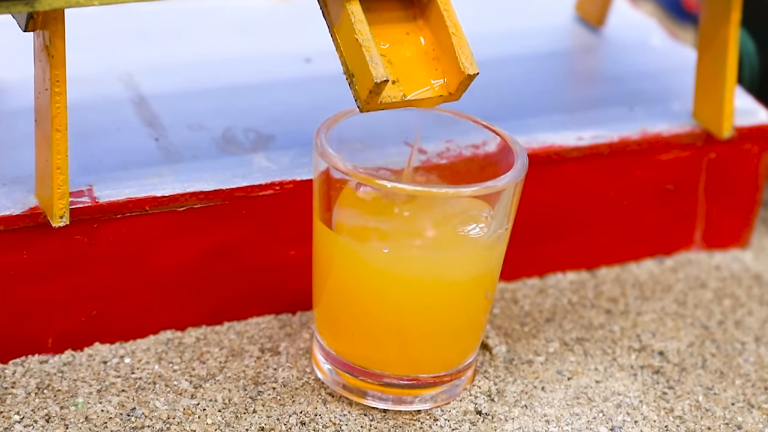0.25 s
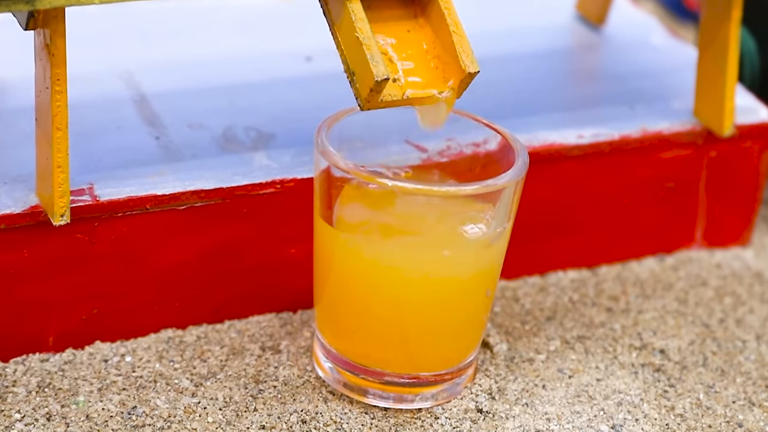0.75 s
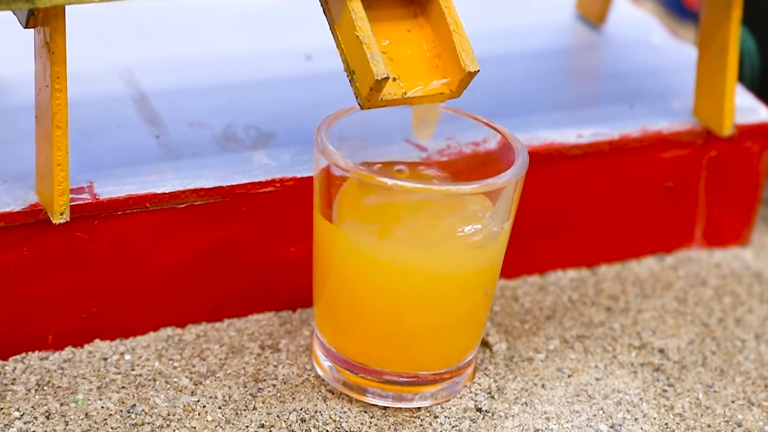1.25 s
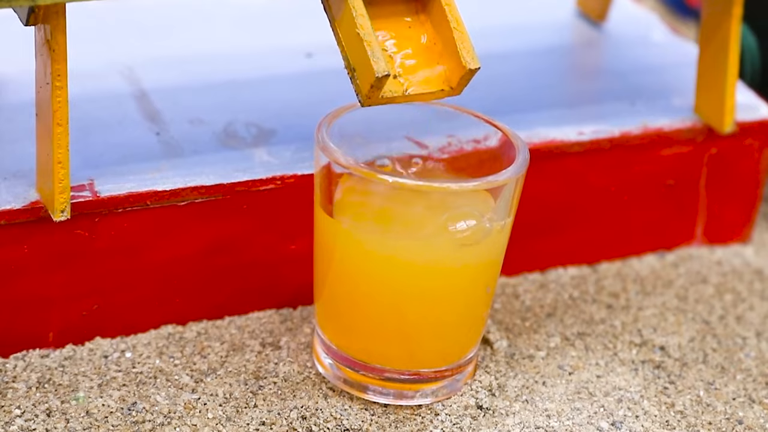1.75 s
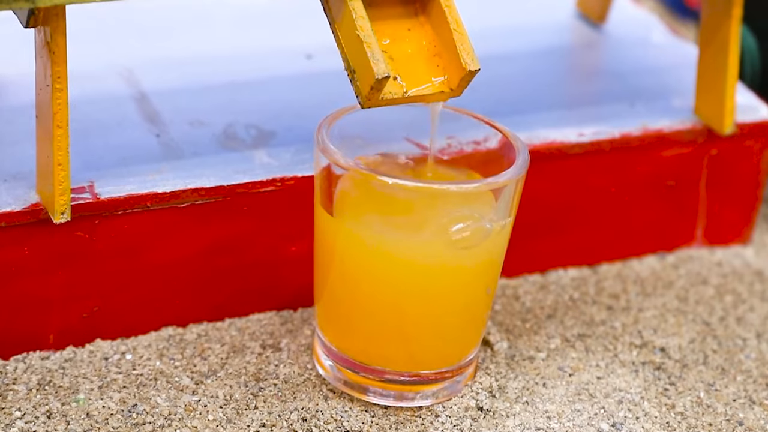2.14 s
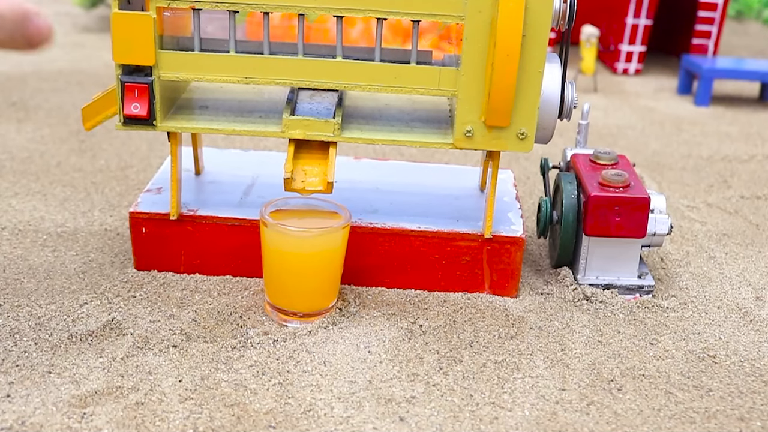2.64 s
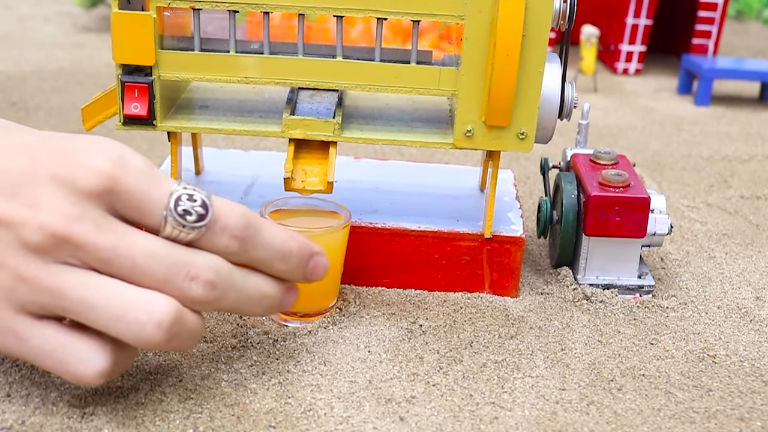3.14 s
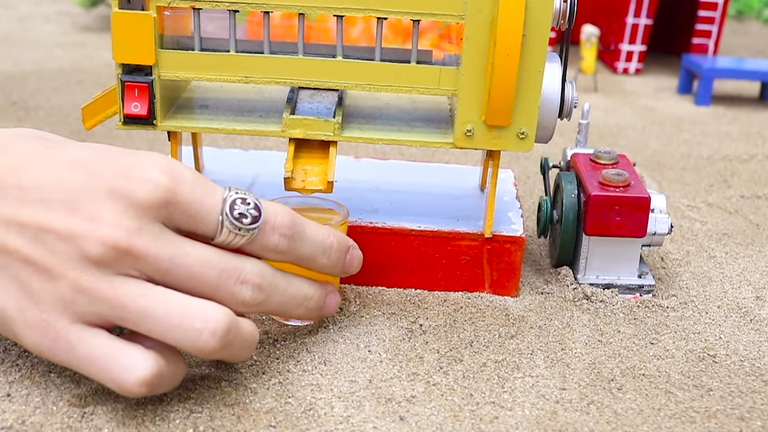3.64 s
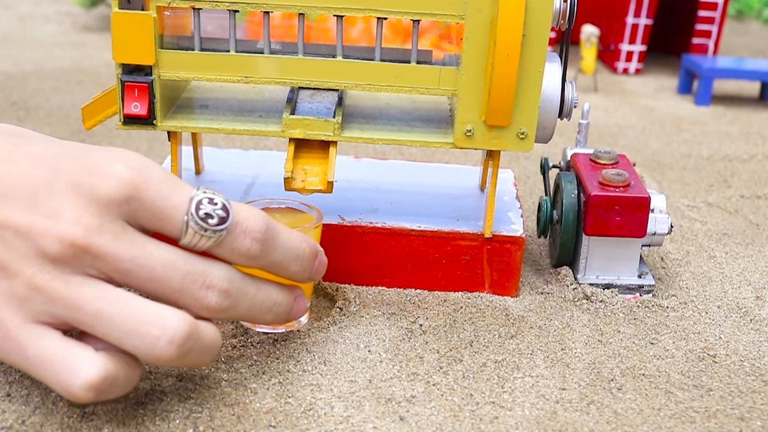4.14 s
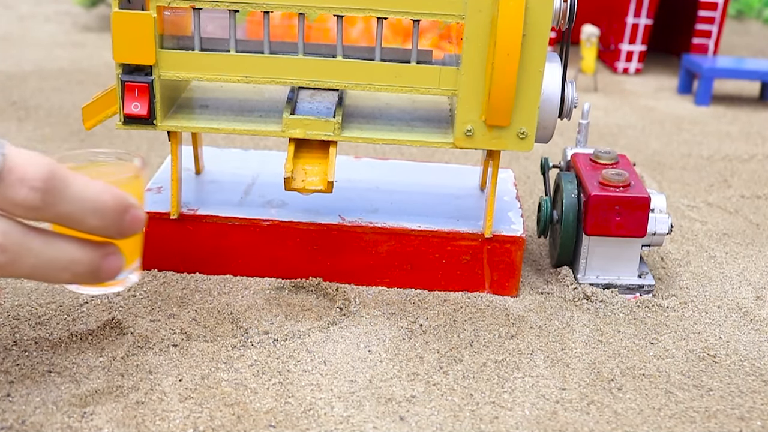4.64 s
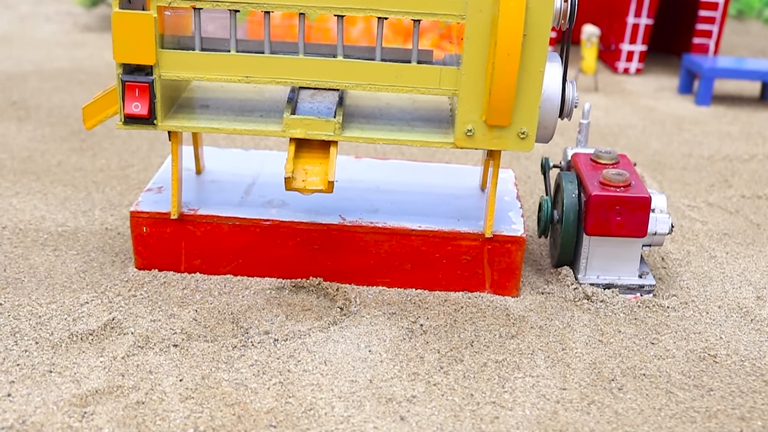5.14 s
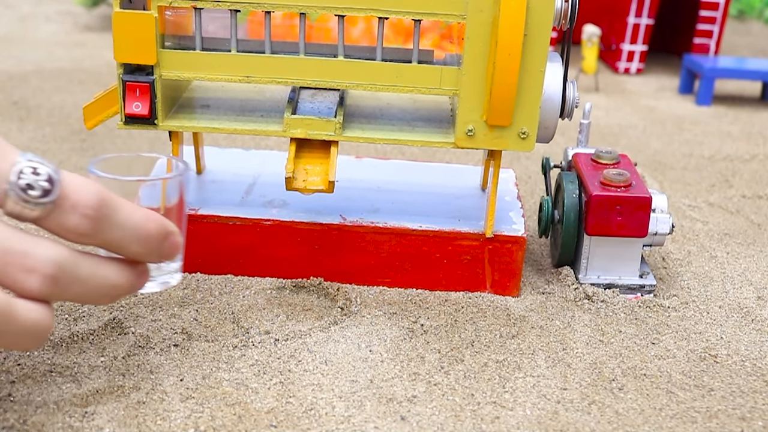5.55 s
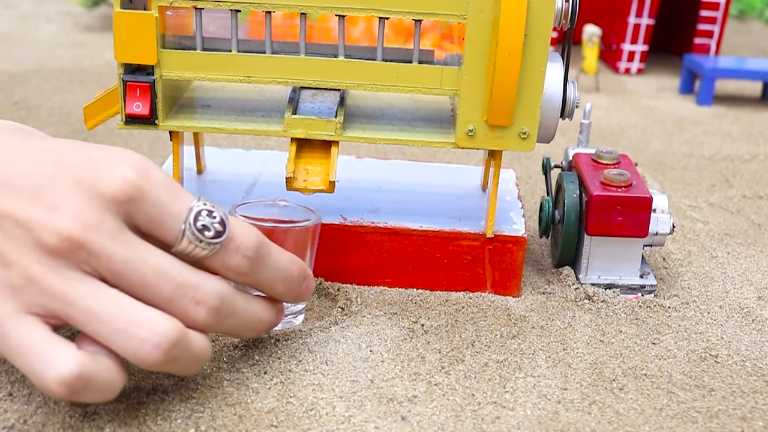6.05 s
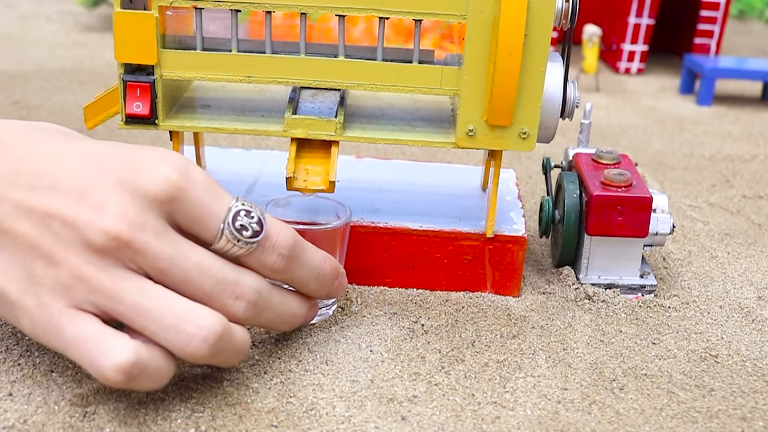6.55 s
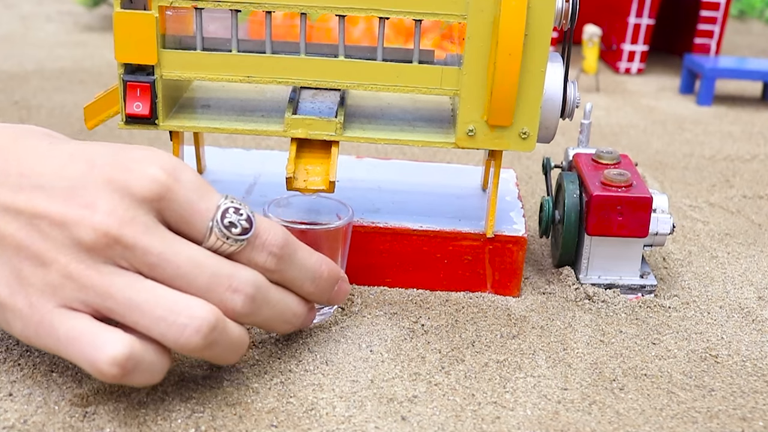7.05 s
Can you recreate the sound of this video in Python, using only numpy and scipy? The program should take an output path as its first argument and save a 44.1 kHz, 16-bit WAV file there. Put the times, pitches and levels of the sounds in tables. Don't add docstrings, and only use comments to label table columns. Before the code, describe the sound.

Buzzing toy motor stops, juice drips and trickles out, a full glass judders away with a thud, and an empty one clinks down amid distant birds.

```python
import sys
import numpy as np
from scipy import signal
from scipy.fft import rfft, irfft
from scipy.io import wavfile
from scipy.ndimage import uniform_filter1d

SR = 44100
rng = np.random.default_rng(int(sys.argv[2]) if len(sys.argv) > 2 else 0)


def elevation(decibels):
    levels = np.asarray(decibels, float)
    return 10 ** (levels / 20)


def to_wav(s):
    ch = np.atleast_2d(s).T
    pcm = np.round(np.clip(ch, -1, 1) * 32767)
    wavfile.write(sys.argv[1], SR, pcm.astype(np.int16))


N = 321930


def evened(x):
    return x / np.sqrt(np.mean(x ** 2) + 1e-20)


def read(points, hz):
    f, value = np.transpose(points)
    return np.interp(np.log(hz + 1), np.log(f + 1), value)


def add(mix, s, sound):
    part = mix[..., round(s * SR):][..., :sound.shape[-1]]
    part += sound[..., :part.shape[-1]]


def colour(x, points):
    gain = elevation(read(points, np.fft.rfftfreq(x.shape[-1], 1 / SR)))
    return irfft(rfft(x) * gain, x.shape[-1])


def resonate(x, hz, width):
    turn = np.exp(2j * np.pi * np.cumsum(hz * np.ones(len(x))) / SR)
    r = np.exp(-np.pi * width / SR)
    return 2 * (turn * signal.lfilter([1 - r], [1, -r], x / turn)).real


def ring(hz, t60, rise=0., length=.05, attack=0.00061):
    t = np.arange(round(length * SR)) / SR
    tone = np.sin(2 * np.pi * hz * (t + .5 * rise * t ** 2 / t60))
    return tone * elevation(-60 * t / t60) * (1 - np.exp(-t / attack))


def burst(hz_low, hz_high, t60, attack=0.00014):
    t = np.arange(2048) / SR
    sos = signal.butter(3, [hz_low, min(hz_high, .49 * SR)], "band", fs=SR, output="sos")
    noise = signal.sosfilt(sos, rng.standard_normal(len(t)))
    puff = noise * elevation(-60 * t / t60) * (1 - np.exp(-t / attack)) ** 2
    return puff / abs(puff).max()


def tail(t60, delay_s, length=1.4):
    t = np.arange(round(length * SR)) / SR
    echoes = rng.standard_normal((2, len(t))) * (rng.random((2, len(t))) < .08)
    taps = echoes * elevation(-60 * t / t60) * (t > delay_s)
    return taps / np.linalg.norm(taps, axis=1, keepdims=True)


# frequency in Hz, correlation from -1 to 1.
EAR_CORRELATION = [(60, 1), (240, 0.89), (950, -0.16), (3770, -0.26), (15000, 0.15)]
# frequency in Hz, density in dB per Hz.
AIR_SPECTRUM = [(12, -34.5), (22, -8.5), (60, 0.5), (160, -11), (540, -27), (850, -27), (1750, -39),
                (4500, -37), (8300, -54), (9000, -60), (11800, -67.5), (12400, -94.5)]
# time in seconds, low singers in dB, high singers in dB.
CHORUS_SWELL = [
    (1.9, -72, -66),
    (2.19, -47, -71.5),
    (3.09, -47, -71.5),
    (4.371, -53.5, -61),
    (7.3, -58, -79.5),
]
AIR_DB = -40.5


def air():
    frames, hz = N // 512 + 5, np.fft.rfftfreq(2048, 1 / SR)[:, None]
    a, b, c, d, patches = rng.standard_normal((frames, 1025, 5)).T
    patches = evened(uniform_filter1d(uniform_filter1d(patches, 16, 0), 8, 1))
    same = np.clip(read(EAR_CORRELATION, hz), -1, 1)
    left = a + 1j * b
    right = same * left + np.sqrt(1 - same ** 2) * (c + 1j * d)
    s, *levels = np.transpose(CHORUS_SWELL)
    frame_s = np.arange(frames) * 512 / SR
    low, high = (np.interp(frame_s, s, db - np.mean(db)) for db in levels)
    swell_db = low * np.exp(-((hz - 3100) / 900) ** 4) + high * np.exp(-((hz - 6400) / 2400) ** 4)
    gain = elevation(read(AIR_SPECTRUM, hz) + (1.5 + hz / 5000) * patches + swell_db)
    field = signal.istft(np.array([left, right]) * gain, nperseg=2048, noverlap=1536)[1]
    return elevation(AIR_DB) * evened(field[:, :N])


# start in seconds, length in seconds, pitch in Hz, level in dB.
HELD_NOTES = [(1.981, 0.12, 3920, -59), (2.015, 0.033, 3620, -56.5), (2.081, 0.021, 2480, -58),
              (2.389, 0.12, 3870, -53.5), (2.395, 0.032, 2750, -56.5), (2.416, 0.051, 2424, -57.5),
              (2.601, 0.021, 4180, -48.5), (2.712, 0.077, 3094, -53), (2.752, 0.024, 2450, -58),
              (2.803, 0.21, 3774, -58.5), (2.965, .02, 3180, -57.5), (3.285, 0.04, 3220, -53),
              (3.681, 0.023, 4346, -49.5), (3.755, 0.062, 7480, -64), (3.916, 0.049, 6100, -56.5),
              (3.994, 0.044, 4360, -47), (4.304, 0.045, 4280, -51), (4.564, 0.087, 4140, -57),
              (4.581, 0.067, 3770, -53), (4.772, 0.063, 5410, -56), (5.04, 0.15, 5220, -59),
              (5.063, 0.087, 5530, -62), (5.338, 0.066, 7240, -60.5), (5.493, 0.085, 7830, -68.5),
              (5.519, .08, 8400, -72.5), (5.57, 0.071, 8070, -66), (5.625, 0.05, 7800, -70),
              (5.708, 0.022, 3870, -50), (5.783, 0.044, 3940, -82), (6.251, .1, 3380, -70),
              (6.297, 0.046, 4230, -69.5), (6.575, 0.29, 1406, -67), (6.645, 0.031, 3160, -66),
              (7.22, .08, 7300, -80)]
SAG = 0.00925
# start in seconds, length in seconds, turning pitch in Hz, level in dB.
DIP_NOTES = [(2.084, 0.15, 2967, -55), (2.12, 0.067, 2606, -54), (2.398, 0.13, 3250, -52),
             (2.45, .06, 2597, -56), (2.793, 0.041, 2614, -52.5), (3.186, 0.02, 2800, -57),
             (3.207, .025, 2850, -56), (3.315, .045, 2830, -53), (3.579, 0.03, 2870, -58.5),
             (7.16, 0.048, 2550, -60)]
# start in seconds, length in seconds, turning pitch in Hz, level in dB.
ARCH_NOTES = [(2.765, .04, 3180, -54), (2.9, .025, 3250, -58), (2.93, 0.045, 3480, -51),
              (3.125, .03, 2750, -57), (3.845, .03, 3800, -61)]
# start in seconds, length in seconds, turning pitch in Hz, level in dB.
TRILL_NOTES = [(3.603, .035, 3200, -57), (3.638, .04, 3200, -57)]
TRILL_BEND = -2.2
BEND_PER_S = 1.9
# start in seconds, first pitch in Hz, last pitch in Hz, level in dB.
SWEEP_NOTES = [(2.298, 5580, 4160, -53.5), (2.579, 5450, 4000, -55.5), (3.428, 4530, 5940, -56.5),
               (3.441, 5220, 3620, -56), (4.208, 8370, 6840, -55), (4.355, 7540, 4520, -47.5),
               (4.456, 7220, 4660, -46.5), (4.557, 6880, 5160, -46), (4.652, 7180, 4150, -46),
               (4.816, 5490, 7420, -50)]
# start in seconds, first pitch in Hz, last pitch in Hz, level in dB.
SLIDE_NOTES = [(2.253, 2250, 1790, -59), (2.583, 2255, 1900, -56), (2.937, 2230, 1750, -61),
               (3.025, 3430, 2690, -54.5), (3.272, 3550, 3280, -54), (3.358, 3200, 3520, -53),
               (3.455, 4200, 3600, -58), (3.867, 4300, 4970, -51.5), (4.085, 6700, 6240, -53),
               (4.243, 6740, 6140, -49.5), (4.715, 4020, 4800, -53.5), (4.775, 4660, 5180, -47),
               (4.849, 7370, 7900, -60), (6.36, 2800, 2450, -69), (6.584, 3600, 2900, -70),
               (7.24, 2770, 3250, -62.5)]
# start in seconds, first pitch in Hz, last pitch in Hz, level in dB.
CHIP_NOTES = [(5.34, 5200, 3600, -68), (5.417, 5160, 3660, -62), (5.727, 5800, 3800, -67),
              (5.865, 6000, 4000, -72), (5.99, 5200, 3800, -70), (6.205, 3700, 5200, -71),
              (6.339, 4180, 6300, -72), (6.646, 3750, 6200, -70), (6.675, 7000, 9000, -70),
              (6.705, 7000, 8600, -71), (6.811, 3740, 6000, -69)]
SWEEP_HZ_PER_S, SLIDE_HZ_PER_S, CHIP_HZ_PER_S = 60000, 15000, 54000


def song():
    notes = [(s, d, hz * (1 + SAG), hz, hz * (1 - SAG), db) for s, d, hz, db in HELD_NOTES]
    for table, way in ((DIP_NOTES, 1), (ARCH_NOTES, -1), (TRILL_NOTES, TRILL_BEND)):
        for s, d, hz, db in table:
            end_hz = hz * (1 + way * BEND_PER_S * d)
            notes.append((s, d, end_hz, hz, end_hz, db))
    for table, pace in ((SWEEP_NOTES, SWEEP_HZ_PER_S), (SLIDE_NOTES, SLIDE_HZ_PER_S),
                        (CHIP_NOTES, CHIP_HZ_PER_S)):
        notes += [(s, abs(b - a) / pace, a, np.sqrt(a * b), b, db) for s, a, b, db in table]
    return notes


def birds():
    notes = song()
    direct, sent = np.zeros((2, N)), np.zeros(N)
    for (s, length, *hz, db), side in zip(notes, rng.uniform(-1.2, 1, len(notes))):
        u = np.linspace(0, 1, round((length + 0.0077) * SR))
        glide = np.clip(u * (1 + .012 / length) - .006 / length, -.04, 1.04)
        pitch = np.polyval(np.polyfit([0, .5, 1], hz, 2), glide)
        slow = uniform_filter1d(uniform_filter1d(rng.standard_normal(len(u)), 300), 300)
        quiver = elevation(1.5 * evened(slow))
        whistle = np.sqrt(2) * np.sin(2 * np.pi * np.cumsum(pitch) / SR)
        note = elevation(db) * whistle * signal.windows.tukey(len(u), .3) * quiver
        add(sent, s - .006, note)
        add(direct[0], s - .006, elevation(2.5 + 3 * side) * note)
        add(direct[1], s - .006 + .00034, elevation(2.0 - 3 * side) * note)
    leaf_taps = tail(0.044, 0.0018, 0.08)
    leaves = np.array([signal.oaconvolve(ear, taps)[:N] for ear, taps in zip(direct, leaf_taps)])
    woods = signal.fftconvolve(sent[None], tail(1.0, 0.003), axes=1)[:, :N]
    return direct + elevation(-3) * leaves + elevation(2.0) * woods


def gate(x, hole_db=-3.3, from_hz=1100):
    hz, t, z = signal.stft(x, SR, nperseg=1024)
    power = (abs(z) ** 2).mean(0)
    level_db = 10 * np.log10(uniform_filter1d(uniform_filter1d(power, 6, 0), 4, 1) + 1e-20)
    usual_db = uniform_filter1d(uniform_filter1d(level_db, 12, 0), 30, 1)
    luck = rng.standard_normal((len(t) // 5 + 1, len(hz) // 6 + 1)).T
    blocks = np.kron(luck, np.ones((6, 5)))[:len(hz), :len(t)]
    shortfall_db = usual_db + hole_db - level_db + 2.2 * blocks
    keep = 1 / (1 + elevation(np.clip(12 * shortfall_db, -80, 80)))
    return signal.istft(z * np.where(hz[:, None] > from_hz, keep, 1), SR, nperseg=1024)[1][:, :N]


def glass(blows, modes, stand_t60, stand_attack, rumble_t60, split, damped_s=9.):
    out, rim = np.zeros((2, N))
    for s, db, stand_hz, rim_db, grit_db in blows:
        add(out, s, elevation(db) * ring(stand_hz, stand_t60, length=.1, attack=stand_attack))
        add(out, s, elevation(db - 20.5) * ring(1.11 * stand_hz, stand_t60, length=.1, attack=stand_attack))
        add(out, s, elevation(db - 13.5) * burst(180, 1500, rumble_t60, attack=0.00086))
        add(out, s, elevation(db + grit_db) * burst(1490, 4600, 0.023, attack=.001))
        add(out, s, elevation(db + grit_db - 9.5) * burst(4800, 10700, 0.02))
        for (hz, mode_db, t60), luck in zip(modes, rng.standard_normal(len(modes))):
            pair = ring(hz, t60, length=.4, attack=0.00072)
            pair = pair + split * ring(hz * 1.012, .5 * t60, length=.4, attack=0.00087)
            add(rim, s, elevation(db + rim_db + mode_db + 2.0 * luck) * pair)
    out = out + rim * np.clip((damped_s - np.arange(N) / SR) / 0.002, 0, 1)
    return signal.sosfilt(signal.butter(12, 13600, fs=SR, output="sos"), out)


# start in seconds, level in dB, stand pitch in Hz, rim in dB over its usual share.
DRAG_BLOWS = [(4.049, -43, 1300, -2), (4.062, -30, 1350, -9), (4.078, -24.5, 1410, -7),
              (4.085, -26, 1580, -4), (4.091, -20.5, 290, -21), (4.102, -22, 1220, -4),
              (4.111, -18, 430, -2), (4.121, -11, 505, -6.5), (4.129, -7, 560, -1), (4.133, -14, 1635, 0.5),
              (4.1395, -11.5, 555, 1), (4.1431, 0, 533, -8), (4.1445, -14, 2600, -0.5),
              (4.154, -19.5, 1695, 7.5), (4.1545, -25, 4500, -13), (4.16, -16, 1137, 4),
              (4.16, -21.5, 402, -18)]
# frequency in Hz, level in dB, t60 in seconds.
FULL_MODES = [(1498, -12, 1.6), (1116, -3.5, 0.14), (3000, -20.5, 0.82), (3044, -0.5, 0.03),
              (1685, -4, 0.066), (2530, -5, 0.068), (2697, 0.5, 0.055), (4500, -3.5, 0.014),
              (5001, -18, 0.12), (7400, -11.5, 0.1), (10080, -15.5, 0.14), (12700, -14, 0.064)]
HAND_DAMPS_S = 4.385
RIM_DB, RIM_FOLLOW, GRIT_DB, GRIT_FOLLOW = -18, 0.61, -24.5, 0.37


def full_glass():
    blows = []
    for s, db, hz, rim_db in DRAG_BLOWS:
        rim = RIM_DB + rim_db - (1 - RIM_FOLLOW) * db
        grit = GRIT_DB + rim_db - (1 - GRIT_FOLLOW) * db
        blows.append((s, db, hz, rim, grit))
    return glass(blows, FULL_MODES, 0.039, 0.0022, 0.064, 0.059, HAND_DAMPS_S)


# start in seconds, level in dB, stand pitch in Hz,
# rim in dB over the blow, grit in dB over the blow.
KNOCK_BLOWS = [
    (6.4437, -5.5, 923, -25, -29.5),
    (6.444, -23, 4870, -32, -34),
    (6.4555, -22.5, 850, -34.5, -32),
    (6.4643, -9, 347, -12, -10),
    (6.4648, -10.5, 975, -36, -8.5),
    (6.4665, -7, 540, -2.5, -13),
    (6.472, -10, 297, -4.5, -12),
    (6.4725, -10, 1526, -27, -13),
    (6.483, -16, 326, -27.5, -13),
]
# frequency in Hz, level in dB, t60 in seconds.
EMPTY_MODES = [(617, -12, 0.14), (990, -16.5, 0.16), (1487, -14, 0.12), (1570, -1, 0.086),
               (2040, -9, 0.035), (2536, -11.5, 0.045), (2994, -9, 0.16), (5070, -3.5, 0.057),
               (6660, -22, 0.07), (7420, -11.5, 0.099), (10020, -30, 0.094), (11300, -41.5, 0.1),
               (12690, -29.5, 0.13)]


def empty_glass():
    return glass(KNOCK_BLOWS, EMPTY_MODES, 0.03, 0.00059, 0.096, 0.27)


# start in seconds, peak in dB, bubble pitch in Hz.
STREAM_GULPS = [(0.123, -7.5, 1880), (.1336, -33, 1900), (0.161, -8, 1620), (0.293, -6.5, 1570),
                (0.525, -9, 1810), (.58, -9.5, 2150), (0.62, -11, 1780), (0.785, -4, 1850),
                (0.819, -9.5, 1370), (.82, -9, 1707), (0.957, -16, 1630), (0.997, -22.5, 2040)]
# start in seconds, peak in dB, bubble
# pitch in Hz.
LATE_DRIPS = [(1.062, -10, 2290), (1.105, -13, 2000), (1.192, -15, 2330), (1.213, -9, 1920),
              (1.237, -20, 3210), (1.266, -18, 2550), (1.309, -20, 2540), (1.344, -27, 1480),
              (1.389, -27, 1750), (1.407, -12, 3460), (1.4063, -18.5, 1730), (1.452, -17, 2270),
              (1.487, -15, 1970), (1.508, -17, 2200), (1.521, -15, 1710), (1.564, -17, 1830),
              (1.594, -12.5, 2340), (1.621, -10.5, 2210), (1.639, -20, 2100), (1.697, -16.5, 1900),
              (1.718, -16.5, 2120), (1.76, -26, 1330), (1.791, -20, 1510), (1.823, -25, 1970),
              (1.902, -19.5, 2750), (1.936, -18, 1950),
              (1.086, -20.5, 2320), (1.121, -27, 1870), (1.135, -26, 3180), (1.177, -34, 2680),
               (1.205, -18.5, 2020), (1.227, -15, 2080), (1.25, -21, 1510), (1.36, -22.5, 2460),
               (1.428, -28, 2390), (1.492, -21, 1940), (1.569, -16.5, 1820), (1.599, -19.5, 2310),
               (1.644, -30, 2480), (1.681, -28, 1410), (1.703, -20, 2060), (1.726, -17, 1550),
               (1.777, -23, 2000), (1.799, -23, 1670), (1.805, -29, 1960), (1.85, -24.5, 2150),
               (1.917, -29, 2480), (1.971, -35.5, 2700), (2.05, -33, 2460), (2.064, -39, 2300)]
SPOUT_HZ, HEADSPACE_HZ, HOLLOW_DB = 435.5, 700, -21


def landings():
    out = np.zeros(N)
    drops = STREAM_GULPS + LATE_DRIPS
    for (s, db, hz), (u, v, w, q) in zip(drops, rng.random((len(drops), 4))):
        add(out, s + 0.001293, elevation(db - 1.5) * ring(hz, 0.01 + 0.013 * u, rise=0.46, attack=0.00041))
        add(out, s + 0.0031 + 0.008 * v, elevation(db - 6.5) * ring(hz * (0.75 + 0.5 * w), .012, rise=0.47))
        hollow_hz = (SPOUT_HZ if q < .5 else HEADSPACE_HZ) * (.9 + 0.22 * u)
        add(out, s + 0.00099, elevation(db + HOLLOW_DB) * ring(hollow_hz, 0.055, rise=0.216, attack=0.00033))
        add(out, s - .001, elevation(db - 9.5) * burst(0.66 * hz, 1.6 * hz, 0.019, attack=0.0045))
        add(out, s + 0.001145, elevation(db - 7 - 4 * w) * burst(0.4 * hz, 4800, 0.004))
        add(out, s, elevation(db - 24.5) * burst(1400, 7000, 0.16, attack=0.0052))
    return out


# start in seconds, peak in dB, hollow pitch in Hz.
DEEP_PLUNGES = [(.105, -15.5, 683), (.126, -31, 580), (.161, -18, 820), (.162, -21, 470), (.163, -18, 1040),
                (.209, -18, 580), (.293, -12, 777), (.312, -26.5, 420), (.361, -19, 790),
                (.481, -21.5, 470), (.525, -18.5, 790), (.617, -13, 802), (.76, -15.5, 784),
                (.87, -17, 770), (.957, -18, 746), (1.063, -24.5, 393), (1.212, -27.5, 380),
                (1.309, -22.5, 747), (1.594, -18, 620), (1.66, -30.5, 450), (1.718, -23, 584),
                (1.78, -26, 760), (1.936, -32, 686)]


def plunges():
    out = np.zeros(N)
    for s, db, hz in DEEP_PLUNGES:
        add(out, s + 0.00092, elevation(db) * ring(hz, 0.037, rise=0.23, attack=0.0012))
        add(out, s, elevation(db - 8.5) * burst(0.52 * hz, 1.68 * hz, 0.032, attack=0.0013))
    return out


# start in seconds, peak in dB, centre in Hz.
BURSTING_DROPLETS = [(0.16, -9.5, 5270), (0.192, -12.5, 5560), (0.2335, -25, 7620), (0.247, -9, 7700),
                     (.2678, -15, 5990), (0.3106, -11.5, 9100), (.4334, -20, 5000), (.4604, -18, 5000),
                     (0.499, -10, 6840), (0.526, -9.5, 4900), (0.539, -15, 7000), (0.616, -13.5, 5460),
                     (0.745, -3, 5950), (0.8182, -18.5, 5240), (0.86, -12, 7050), (0.902, -14, 7590),
                     (1.006, -17, 10000), (1.023, -13, 9800), (1.052, -18, 11700), (1.066, -5.5, 8100),
               (1.0929, -25, 4500), (1.106, -14, 6330), (1.1214, -15.5, 10000), (1.1507, -16, 7460),
               (1.1557, -13, 9700), (1.1943, -18.5, 5570), (1.2121, -29, 4650), (1.2386, -21, 4700),
               (1.251, -20, 7780), (1.268, -15.5, 4700), (1.3109, -8, 6300), (1.3418, -14.5, 4660),
               (1.354, -22, 7400), (1.4085, -32, 4820), (1.4184, -24, 10400), (1.4441, -19, 5070),
               (1.488, -20, 4720), (1.5073, -19.5, 5940), (1.559, -17, 4590), (1.565, -15, 9800),
               (1.595, -19, 6510), (1.6242, -8.5, 4900), (1.64, -14, 12400), (1.674, -18, 10300),
               (1.6833, -20, 4600), (1.703, -15.5, 4840), (1.719, -19, 7800), (1.7284, -25, 7450),
               (1.7404, -23, 7550), (1.7607, -19.5, 12200), (1.799, -21, 6200), (1.8204, -16, 6460),
               (1.84, -24, 4940), (1.8527, -26, 7350), (1.862, -21, 5300), (1.876, -26, 5330),
               (1.9023, -9.5, 6260), (1.9162, -15.5, 6750), (1.9375, -26, 10200), (1.982, -37, 4640),
               (2.0527, -22.5, 9700), (2.087, -40, 4800)]


def spits():
    out = np.zeros(N)
    for s, db, hz in BURSTING_DROPLETS:
        snap = ring(hz, 0.0017, rise=.3, length=.005, attack=0.00014)
        add(out, s + .0006, elevation(db + 4.0) * snap)
        add(out, s - .002, elevation(db - 8.5) * burst(.5 * hz, 1.67 * hz, 0.013, attack=0.0027))
        add(out, s - .004, elevation(db - 15.5) * burst(4100, 13000, 0.028, attack=0.0041))
    return out


# time in seconds, fizz in dB, gurgle in dB.
TRICKLE_LEVELS = [
    (0.0, -34, -27),
    (1.119, -45.5, -40),
    (1.68, -43.5, -40),
    (2.3, -74, -37),
]


def trickle():
    s, fizz_db, gurgle_db = np.transpose(TRICKLE_LEVELS)
    size = elevation(3.5 * np.minimum(rng.exponential(1, N), 4)) * (rng.random(N) < 2200 / SR)
    size *= elevation(2.5 * evened(uniform_filter1d(rng.standard_normal(N), 600)))
    kind = rng.integers(0, 96, N) // 4 + 24 * (rng.random(N) < .06)
    fizz, bubbles, glugs = np.zeros((3, N))
    for k in range(12):
        tiny = ring(4500 * 1.4 ** k, 0.0012, rise=0.47, attack=.0003)
        middling = ring(1300 * 1.08 ** k, 0.013, rise=0.37, attack=0.00044)
        large = ring(380 * 1.085 ** k, 0.03, rise=.2, attack=0.00076)
        fizz += signal.oaconvolve(size * (kind == k), tiny)[:N]
        bubbles += signal.oaconvolve(size * (kind == k + 12), middling)[:N]
        glugs += signal.oaconvolve(size * (kind == k + 24), large)[:N]
    spray = evened(np.diff(rng.standard_normal(N + 1)) * uniform_filter1d(size, 900) ** 2)
    t = np.arange(N) / SR
    fizz_gain = elevation(np.interp(t, s, fizz_db, right=-120) - 4.5)
    gurgle_gain = elevation(np.interp(t, s, gurgle_db, right=-120) - 4.5)
    gurgle_gain = gurgle_gain * np.clip((2.02 - t) / 0.2, 0, 1)
    fizzing = fizz_gain * (evened(fizz) + elevation(-10.0) * spray)
    return fizzing + gurgle_gain * (evened(bubbles) + elevation(-6.5) * evened(glugs))


def juice():
    return landings() + plunges() + spits() + trickle()


# time in seconds, shaft speed in Hz, effort in dB.
DRIVEN = [
    (0.0, 202.7, -22.5),
    (0.161, 208.5, -25),
    (.57, 210.3, -24),
    (0.619, 211.3, -27.5),
    (0.656, 217.4, -23.5),
    (0.731, 205.4, -22.5),
]
# time in seconds, shaft speed in Hz, effort in dB.
COASTING = [
    (0.789, 137, -24.5),
    (0.831, 56, -28.5),
    (0.902, 32, -27),
    (1.09, 31, -37.5),
    (1.16, 18, -51),
]
# multiple of shaft speed, level in dB over effort.
ORDERS = [(1, -17), (4, -28), (5, -27), (6, -20), (8, -9.5), (9, -30.5), (10, -18.5), (11, -22),
          (12, -27.5), (13, -17.5)]
# frequency in Hz, width in Hz, level in dB.
HOUSING_MODES = [(802, 60, -4), (1021, 30, 0), (1814, 55, -7), (2650, 230, 4.5), (3920, 70, -5.5),
                 (4940, 250, -22.5)]
# frequency in Hz, density in dB per Hz.
GRIND_SPECTRUM = [(35, -40), (60, -9.5), (149, -26.5), (207, -16), (294, -17), (803, -6), (1170, -8.5),
                  (1660, 0.5), (4030, -7.5), (4640, -17), (14900, -33), (16000, -40.5)]
# start in seconds, pitch in Hz, peak in dB, t60 in seconds.
FRAME_NOTE = (0.8, 59, -25, 0.2)
# time in seconds, pitch in Hz, level in dB.
ROLLER_WHINE = [
    (.78, 2010, -66.5),
    (.835, 2054, -25.5),
    (.87, 1990, -36),
    (.912, 2096, -28),
    (.945, 2048, -40),
    (1.01, 2070, -33.5),
    (1.1, 2060, -60.5),
]
# time in seconds, pitch in Hz, level in dB.
IDLER_MOAN = [
    (.79, 1140, -48.5),
    (.83, 1035, -32),
    (.865, 965, -32),
    (.89, 1038, -47),
    (.95, 1162, -37),
    (.988, 1006, -38.5),
    (1.02, 1037, -48),
    (1.07, 1016, -56),
]


def motor():
    s, hz, effort_db = np.transpose(DRIVEN + COASTING)
    t = np.arange(round(s[-1] * SR)) / SR
    wobble = evened(uniform_filter1d(rng.standard_normal((len(t), 2)), 500, axis=0)).T
    speed = np.interp(t, s, hz)
    turns = np.cumsum(speed * (1 + 0.004 * wobble[0])) / SR
    tones = np.zeros(len(t))
    for k, db in ORDERS:
        order = np.sqrt(2) * np.sin(2 * np.pi * k * turns)
        tones += elevation(db) * order * (speed / hz[0]) ** (k - 1)
    tones = tones * elevation(1.9 * wobble[1]) * np.clip((speed - 48) / 12, 0, 1)
    pulse = 1.0 + np.exp(-(turns % 1) / 0.23)
    teeth = rng.standard_normal(len(t)) * pulse * elevation(0.93 * wobble[0])
    shell = sum(elevation(db) * evened(resonate(teeth, f, 1.1 * w)) for f, w, db in HOUSING_MODES)
    grinding = elevation(-1.5) * evened(colour(teeth, GRIND_SPECTRUM)) + elevation(-11.5) * evened(shell)
    out = elevation(np.interp(t, s, effort_db)) * (tones + grinding)
    start, frame_hz, db, t60 = FRAME_NOTE
    add(out, start, elevation(db + 12.0) * ring(frame_hz, t60, length=0.25, attack=.03))
    for table, waver in ((ROLLER_WHINE, .012), (IDLER_MOAN, .015)):
        s, hz, db = np.transpose(table)
        pitch = np.interp(t, s, hz) * (1 + waver * wobble[1])
        whine = evened(np.sin(2 * np.pi * np.cumsum(pitch) / SR))
        out = out + elevation(np.interp(t, s, db, left=-120)) * whine
    return out


# frequency in Hz, level in dB.
SCATTER_SPECTRUM = [(40, -9), (200, -13), (550, -11), (1700, -16), (5000, -20), (9000, -20), (15000, -18)]


def scene():
    near = juice() + full_glass() + empty_glass()
    add(near, 0, motor())
    thrown_back = colour(np.pad(near, (0, SR)), SCATTER_SPECTRUM)
    scatter = signal.fftconvolve(thrown_back, tail(0.084, 0.00092, 0.14)[0])[:N]
    return near * elevation([[-.2], [.2]]) + np.outer([1, -1], scatter) + gate(birds() + air())


def top_cut(x):
    return signal.sosfilt(signal.butter(12, 16660, fs=SR, output="sos"), x)


def record(dry):
    edge = signal.firwin(255, 15700, window=("kaiser", 7), fs=SR)
    rounded = 0.74 * np.tanh(dry / 0.76)
    return top_cut(signal.oaconvolve(rounded, edge[None], "same"))


dry = scene()
out = record(dry)
to_wav(out)
```